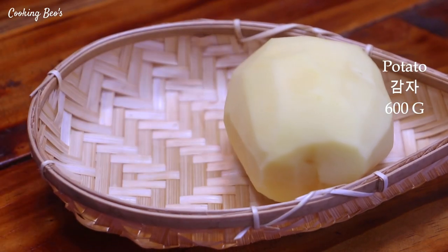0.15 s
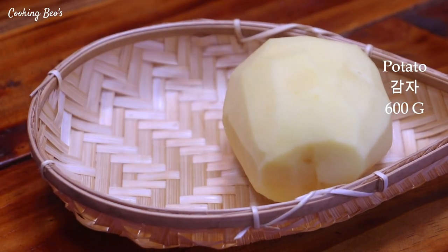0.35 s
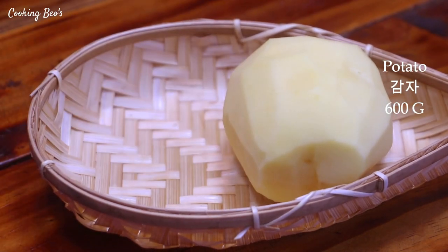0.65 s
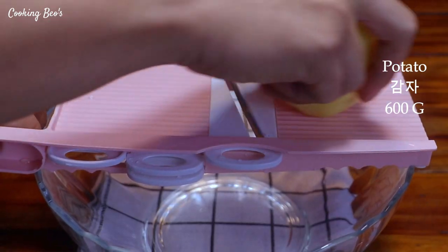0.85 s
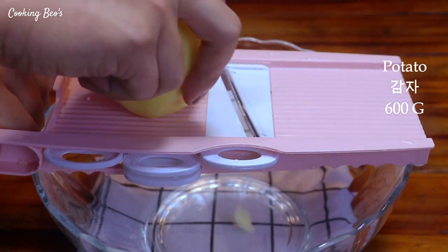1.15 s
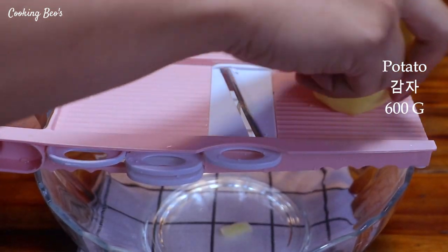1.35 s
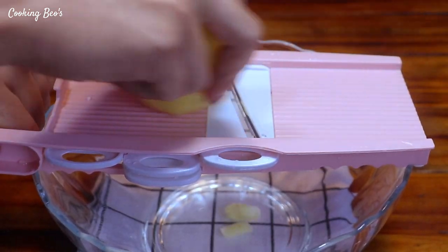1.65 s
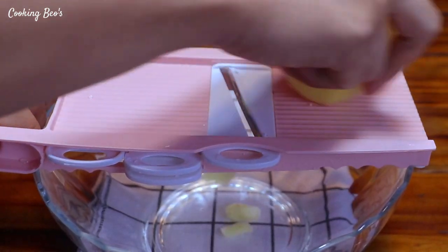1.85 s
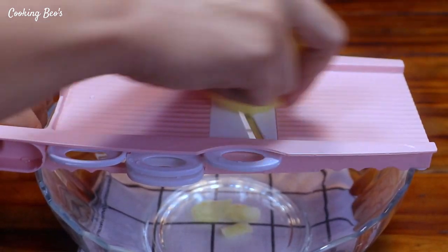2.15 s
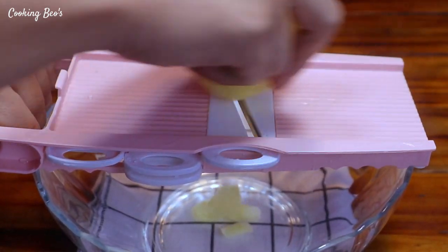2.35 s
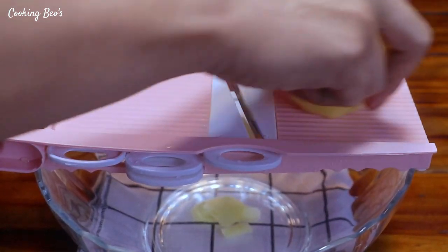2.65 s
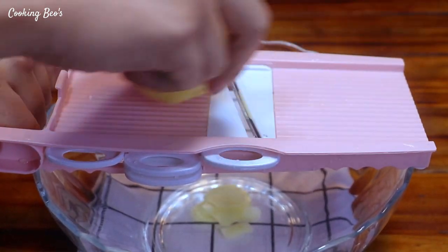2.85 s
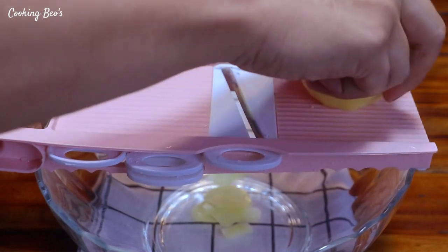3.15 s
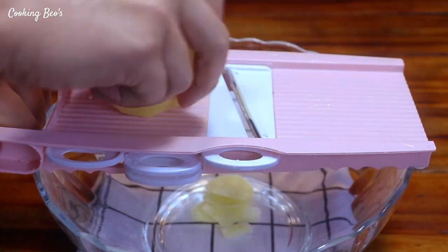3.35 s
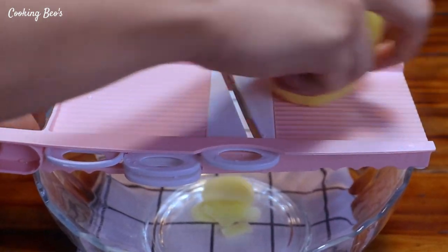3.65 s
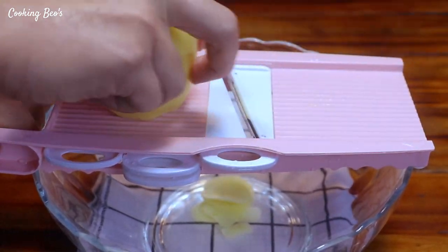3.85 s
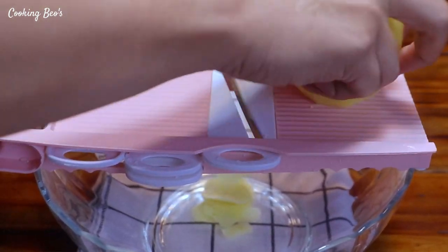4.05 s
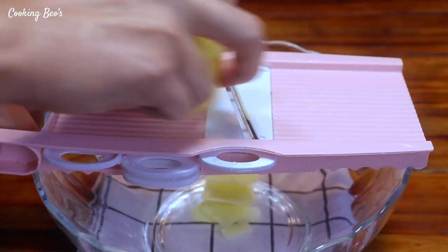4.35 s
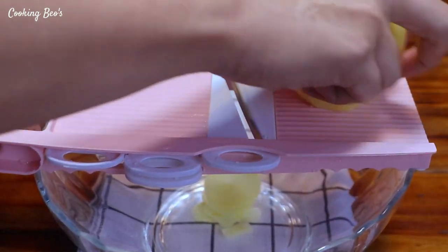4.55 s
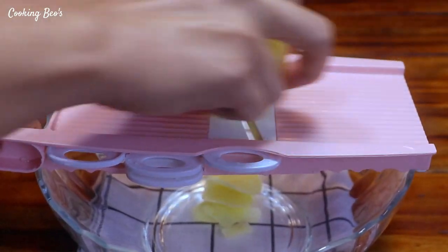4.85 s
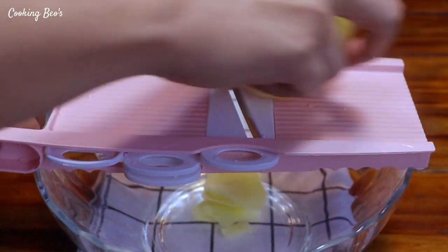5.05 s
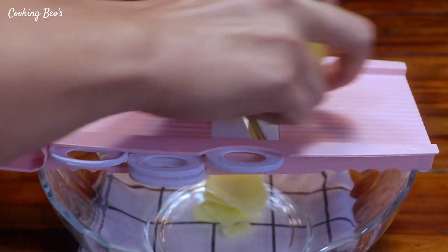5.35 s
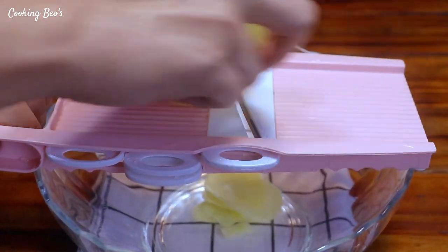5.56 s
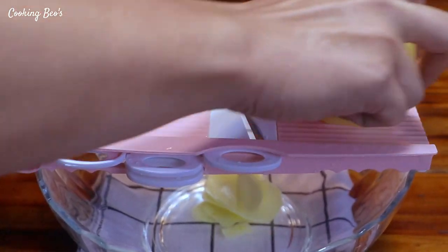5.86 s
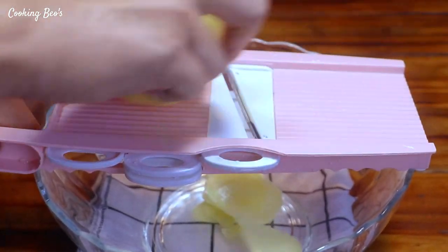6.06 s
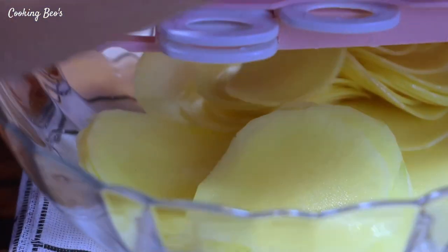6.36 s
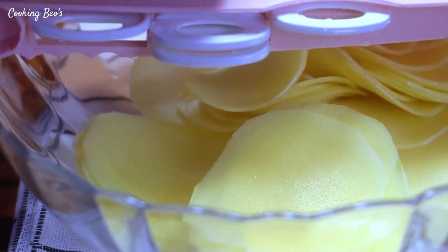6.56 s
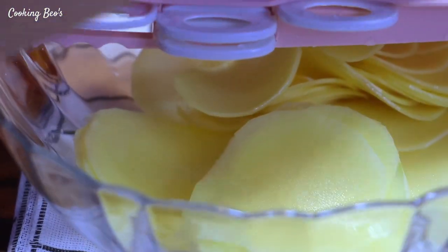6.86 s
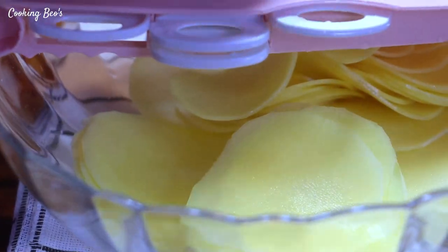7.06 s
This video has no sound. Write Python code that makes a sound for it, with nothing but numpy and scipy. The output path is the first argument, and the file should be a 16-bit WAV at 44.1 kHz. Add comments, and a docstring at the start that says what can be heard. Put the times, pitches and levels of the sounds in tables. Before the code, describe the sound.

After a short silence and a faint noise burst, a raw potato is pushed over a plastic slicer resting on a glass bowl. It groans and squeaks softly, then settles into wet, grainy rasps twice a second, with snaps and hollow knocks growing louder. Later, quicker rubs fill the gaps. Close microphone, slightly overloaded, small kitchen reverberation.

```python
"""After silence a brief burst of noise, without reverberation, opens the sound; a kitchen murmurs, a table rumbles.
A raw potato goes to and fro over a plastic mandoline on a glass bowl: it catches, groans or squeaks, and the
blade bites, rasps through wet cells and snaps slices free. Crackling force excites the plate's resonances.
Rubs over the ribs, ringing knocks as the potato lands or the plate hits the bowl and, once, a singing blade
join in, made of crackle, noise bursts and a sine. The close microphone overloads and the sound is doubled."""
import sys
import numpy as np
from scipy import signal
from scipy.fft import rfft, irfft, next_fast_len
from scipy.io import wavfile
from scipy.ndimage import uniform_filter1d, map_coordinates

SR = 44100
rng = np.random.default_rng(int(sys.argv[2]) if len(sys.argv) > 2 else 0)


def transcribe(u):
    """Save the signal u as a 16-bit wav file named by the first command-line argument.

    u: samples, shape (n,) or (channels, n), limited to [-1, 1]; the rate is SR.
    q: integer samples, one column per channel.
    """
    v = np.clip(np.atleast_2d(u).T, -1, 1)
    q = np.round(v * 32767).astype(np.int16)
    wavfile.write(sys.argv[1], SR, q)


N = 317860
START = 0.7  # s, silence before the sound
BOW_SHARE = 0.48  # the plate bows most at this share of a cut's hold

# All table levels are relative: each layer adds its own trim.
# passes through the blade: [t/s, rise/s, hold/s, bite level/dB, exit level/dB, slide level/dB, flex level/dB,
# hiss over rasp/dB, bite f/Hz, exit f/Hz]
CUT_PASSES = [(0.819, 0.06, .095, -22, -22, -48, -32, -4.5, 2590, 2420),
              (1.332, 0.022, 0.064, -16, -17, -43, -21.5, -3.5, 2340, 2140),
              (1.78, 0.036, .034, -12.5, -13.5, -29.5, -22, -3, 1950, 1790),
              (2.21, 0.051, 0.074, -12.5, -23, -37.5, -21, -4.5, 1850, 1290),
              (2.647, 0.048, 0.041, -10.5, -15, -25, -22, -4, 2320, 1380),
              (3.114, 0.04, 0.051, -9.5, -16, -33.5, -19, -4, 3110, 1620),
              (3.564, 0.039, 0.052, -8, -16, -35.5, -17.5, -5, 2960, 2000),
              (4.026, 0.041, 0.043, -5.5, -22.5, -39, -16.5, -5, 3460, 1730),
              (4.489, 0.041, 0.069, -5, -18, -35.5, -19.5, -6, 3550, 1950),
              (4.94, 0.036, 0.072, -5.5, -16, -31.5, -18, -6, 3520, 1980),
              (5.409, 0.041, 0.067, -6, -13, -27, -18.5, -5, 3430, 2900),
              (5.854, 0.037, 0.062, -4, -8.5, -24, -14, -6, 2750, 2410),
              (6.267, .036, 0.062, -7.5, -11, -32.5, -22, -4.5, 3230, 2030),
              (6.724, 0.044, 0.039, -8.5, -11.5, -29, -19.5, -3.5, 3230, 2200)]
# knocks as the potato lands on the plate or the plate hits the bowl: [t/s, level/dB, flex over level/dB,
# hiss over level/dB, flex centre f/Hz, ring centre f/Hz]
PLATE_KNOCKS = [(1.323, -14, -18, -6.5, 520, 1750), (1.774, -17, -11.5, -4.5, 587, 2670),
                (2.085, -43.5, 1.5, -18, 597, 2300), (2.101, -41, 2, -23, 570, 2300),
                (2.206, -14, -17.5, -9, 590, 3800), (2.556, -29.5, -0.5, -29, 620, 1300),
                (2.562, -16, -9.5, -53, 624, 1420), (2.634, -17, -18, -8, 630, 2560),
                (3.017, -27, 0.5, -46, 590, 1300), (3.025, -10, -8.5, -50, 585, 1320),
                (3.436, -38, -1.5, -21, 610, 2300), (3.457, -35, -1, -33, 624, 1800),
                (3.93, -14, -16, -38, 635, 1310), (4.371, -15, -9.5, -50, 612, 1770),
                (4.858, 3.5, -15, -17, 622, 3480), (5.305, 2.5, -23, -15.5, 620, 2030),
                (5.754, -1.5, -16, -26, 615, 1900)]
# middle spectrum of the plate, damped or free: [f/Hz, level per Hz/dB]
RASP_SPECTRUM = [(700, -31.5), (1050, -9.5), (1220, 0.5), (1500, 4), (2300, 3.5), (3500, -3), (4400, -4),
                 (5600, -30), (6400, -41), (9000, -33.5)]


def amp(db):
    """Decibels to gain."""
    return 10 ** (np.asarray(db) / 20)


def unit(x):
    """x at rms 1."""
    return x / np.sqrt(np.mean(x ** 2) + 1e-20)


def along(points, hz):
    """(Hz, value) points read on a log frequency axis."""
    f, value = np.transpose(points)
    return np.interp(np.log(hz + 1), np.log(f), value)


def resonances(modes, hz):
    """Joint gain of (Hz, width Hz, dB) modes, whose powers add."""
    power = 0
    for centre, width, db in modes:
        power = power + (amp(db) * hz * width) ** 2 / ((centre * centre - hz * hz) ** 2 + (hz * width) ** 2)
    return np.sqrt(power)


def coloured(x, gain):
    """x through the causal minimum-phase filter that has this gain over frequency."""
    size = 2 * next_fast_len(len(x) // 2 + 4096)
    cepstrum = irfft(np.log(gain(np.fft.rfftfreq(size, 1 / SR)) + 1e-6), size)
    # folding the cepstrum forward in time makes the filter causal
    cepstrum[1:size // 2] *= 2
    cepstrum[size // 2 + 1:] = 0
    return irfft(rfft(x, size) * np.exp(rfft(cepstrum)), size)[:len(x)]


def wobble(rate):
    """A smooth random curve, rate knots a second."""
    knots = rng.standard_normal(int(N * rate / SR) + 4)
    return map_coordinates(knots, [np.arange(N) * rate / SR])


def crackle(rate, spread_db):
    """Tiny ruptures at random moments, a few much larger than the rest."""
    size = amp(spread_db * np.minimum(rng.exponential(size=N), 4))
    ruptures = rng.random(N) < rate / SR
    return ruptures * size * rng.choice([-1, 1], N)


def emphasis(hz, centre_hz, boost_db, octaves):
    """The potato's position on the plate favours the modes near one frequency."""
    return 1 + amp(boost_db) / (1 + (np.log2((hz + 1) / centre_hz) / octaves) ** 2)


def swept(x, centre_hz, boost_db, octaves, patchy_db):
    """x at rms 1 under a moving emphasis; the shifting contact lights up changing patches of modes."""
    hz, t, z = signal.stft(x, SR, nperseg=1024)
    gain = emphasis(hz[:, None], np.interp(t * SR, np.arange(N), centre_hz), boost_db, octaves)
    patches = uniform_filter1d(rng.standard_normal(z.shape), size=7, axis=0)
    patches = uniform_filter1d(patches, size=3, axis=1)
    gain = gain * amp(patchy_db * unit(patches))
    power = np.mean(np.abs(z) ** 2, axis=1)
    # the sweep changes colour only: every frame is levelled
    levelled = z * gain / np.sqrt(power @ gain ** 2)
    return unit(signal.istft(levelled, SR, nperseg=1024)[1][:N])


def rasp(hz, broad_db=-7):
    """The middle voice of the plate while the potato damps it."""
    # resonances of the plate under the potato: [f/Hz, width/Hz, level/dB]
    loaded_modes = [(1175, 143, -0.5), (1847, 46, -2.5), (2626, 41, -3), (3050, 134, -7), (3435, 260, 0),
                    (3883, 385, 1), (5500, 120, 0), (5380, 110, 16)]
    return amp(along(RASP_SPECTRUM, hz)) * np.hypot(amp(broad_db), resonances(loaded_modes, hz))


def flex(hz, edge_hz=1100, low_hz=190):
    """The hollow low voice of the bending plate, which is too small to radiate deep bass."""
    # bending modes of the plate on the bowl, pressed by the hand: [f/Hz, width/Hz, level/dB]
    bending_modes = [(225, 80, -14.5), (284.4, 6.7, -6.5), (349, 39, -4), (558, 89, 1.5), (589, 26, -1.5),
                     (634, 25, 2.5), (704, 66, 0), (735, 96, -2), (940, 410, -8)]
    return resonances(bending_modes, hz) / np.sqrt(1 + (hz / edge_hz) ** 8 + (low_hz / (hz + 1)) ** 4)


def hiss(hz):
    """The wet treble, straight from the blade's edge."""
    # treble spectrum: [f/Hz, level per Hz/dB]
    wet_spectrum = [(3000, -34.5), (5000, -4.5), (6000, -2), (7500, -3.5), (10300, -10), (15000, -9.5),
                    (16200, -28.5)]
    return amp(along(wet_spectrum, hz))


def opening(db=-21, length=0.013, t60=0.08):
    """One brief, fading noise burst through all three voices (length and t60 in s)."""
    t = np.arange(N) / SR - START
    force = rng.standard_normal(N) * (t > 0) * (t < length) * amp(-60 * np.abs(t) / t60)
    burst = coloured(force, lambda hz: rasp(hz) + .5 * flex(hz) + 0.21 * hiss(hz))
    return amp(db) * burst / np.sqrt(np.sum(burst ** 2) / (length * SR))


def air(db=-60):
    """The low murmur of the room, as coloured steady noise."""
    # murmur spectrum: [f/Hz, level per Hz/dB]
    room_spectrum = [(25, -34), (60, -3), (90, -23), (150, -25), (250, 10), (450, -12), (1000, -8),
                     (3000, -3.5), (6000, -12), (16000, -23)]
    return amp(db) * unit(coloured(rng.standard_normal(N), lambda hz: amp(along(room_spectrum, hz))))


def thuds(knock_db=-40.5, bow_db=-34.5, share=0.39):
    """(s, dB) of each push on the table by a knock or bowing plate; share is how much blow level counts."""
    knocks = [(s, knock_db + share * db) for s, db, *_ in PLATE_KNOCKS]
    bows = [(s + rise + BOW_SHARE * hold, bow_db + share * flex_db)
            for s, rise, hold, _, _, _, flex_db, *_ in CUT_PASSES]
    return knocks + bows


def table(rumble_db=2, thud_db=6, t60=0.26, scatter_db=2.5):
    """The wooden table rumbles under the sliding hand and its modes boom briefly at each soft thud."""
    # rumble as the hand shakes the table: [t/s, level/dB]
    hand_weight = [(0.7, -62), (1.151, -57), (1.9, -58), (4.6, -52), (5.9, -55), (6.1, -61), (7.21, -62.5)]
    # low modes of the table: [f/Hz, width/Hz, level/dB]
    table_modes = [(62.4, 24, -2), (106.8, 32, 0), (172, 147, -3.5)]
    shake = unit(coloured(rng.standard_normal(N), lambda hz: resonances(table_modes, hz) ** 2))
    rumble = amp(rumble_db + np.interp(np.arange(N) / SR, *np.transpose(hand_weight)))
    out = np.pad(shake * rumble, (0, SR))
    t = np.arange(SR // 3) / SR
    swell = 1 - np.exp(-(t / .012) ** 2)
    for s, db in thuds():
        boom = np.zeros(len(t))
        for hz, _, level in table_modes:
            # each thud strikes the modes in slightly different proportions
            boom += amp(level + rng.normal(0, scatter_db)) * np.sin(2 * np.pi * hz * t)
        out[round(s * SR):][:len(t)] += amp(db + thud_db - 60 * t / t60) * swell * boom
    return out[:N]


def blows(events, middle, chatter, t60, middle_db, flex_db, hiss_db, middle_boost_db, flex_boost_db):
    """Each contact chatters for chatter s, then dies away over t60 s; the spot where it lands colours it."""
    out, t = np.zeros(N + SR), np.arange(SR // 6) / SR
    fade = amp(-60 * np.maximum(t - chatter, 0) / t60)
    for s, db, low, high, flex_hz, middle_hz in events:
        force = rng.standard_normal(len(t)) * fade
        clack = lambda hz: middle(hz) * emphasis(hz, middle_hz, middle_boost_db, octaves=0.13)
        thump = lambda hz: flex(hz) * emphasis(hz, flex_hz, flex_boost_db, octaves=0.089)
        for voice, level in ((clack, middle_db), (thump, low + flex_db), (hiss, high + hiss_db)):
            part = coloured(force, voice)
            # levelled on its first 10 ms
            out[round(s * SR):][:len(t)] += amp(db + level) * part / part[:SR // 100].std()
    return out[:N]


def snapping():
    """Damped snaps: short noise bursts in the loaded plate as the potato catches or sheds its slice."""
    # the potato catches, meets the blade or sheds its slice: [t/s, level/dB, flex over level/dB,
    # hiss over level/dB, flex centre f/Hz, rasp centre f/Hz]
    snaps = [(0.747, -38, -19, -11, 297, 2570), (0.926, -12.5, -16, -7.5, 530, 3560),
             (1.1185, -18.5, -33, -14, 340, 3900), (1.1626, -16.5, -9, -35, 610, 1210),
             (1.1834, -24, -12, -4.5, 676, 2270), (1.3718, -8, -30, -20, 690, 3460),
             (1.3892, -3.5, -15, -24, 637, 1370), (1.6404, -16, -7.5, -15, 600, 1190),
             (1.8446, 2.5, -15.5, -15, 603, 1600), (2.293, 0.5, -19, -31, 635, 1240),
             (2.7235, 5.5, -19, -18, 577, 1290), (2.846, -15.5, -29, -12, 800, 1230),
             (3.093, -18.5, -15, -12, 650, 2550), (3.1133, -10.5, -25, -10.5, 530, 2030),
             (3.5465, -18, -3.5, -12, 547, 1860), (3.565, -5.5, -15, -13.5, 620, 1830),
             (3.6447, -8.5, -17.5, -8, 655, 1670), (4.003, -21, 0, -10, 644, 1160),
             (4.025, -8.5, -8.5, -8, 610, 2000), (4.0974, -10, -1.5, -19, 597, 1260),
             (4.1115, -2.5, -15.5, -11.5, 720, 1590), (4.4652, -15, -5, -16, 776, 1900),
             (4.4876, -4, -26, -10, 630, 1830), (4.5664, -8.5, -8, -5.5, 570, 1280),
             (4.9124, -15, -1, -12, 810, 1850), (4.937, -2, -15, -12, 588, 2700),
             (5.0164, -6, -8.5, -29, 550, 1620), (5.139, -30, -31, -6.5, 650, 1210),
             (5.382, -9.5, -6.5, -22, 840, 2350), (5.407, -4.5, -12.5, -8.5, 595, 1800),
             (5.444, 0, -16, -15, 670, 3230), (5.4764, -4.5, -4.5, -9, 610, 1140),
             (5.8287, -9, -4.5, -18, 640, 2520), (5.8486, -9, -2, -8, 606, 2600),
             (5.8816, 2.5, -9.5, -10, 620, 1860), (5.9154, 7.5, -14.5, -17, 625, 1380),
             (6.124, -25.5, -2.5, -16, 490, 2000), (6.2533, -17, -3.5, -23, 640, 1670),
             (6.478, -14, -11.5, -12, 570, 3500), (6.523, -16.5, -30, -11, 686, 3930),
             (6.5555, -20, -12, -19, 513, 3500), (7.03, -27.5, -0.5, -19, 506, 2300),
             (7.0476, -17.5, -10, -19, 540, 2280), (7.168, -14.5, -2.5, -24, 785, 1770)]
    return blows(snaps, rasp, chatter=0.0038, t60=0.034, middle_db=-9.5, flex_db=-0.5, hiss_db=-6.5,
                 middle_boost_db=6.5, flex_boost_db=9.5)


def kitchen(x, build=0.014):
    """Hard walls answer with a diffuse tail that builds up (s), each frequency dying at its own speed."""
    # reverberation of the kitchen: [f/Hz, t60/s]
    decay_times = [(80, 0.7), (200, 0.78), (530, 0.33), (1250, 0.4), (2200, 0.23), (3300, 0.29),
                   (4600, 0.38), (7000, 0.28), (15000, 0.21)]
    out, piece = np.zeros(N + 2 * SR), SR // 3
    # every third of a second meets a fresh random tail
    for first in range(0, N, piece):
        hz, t, z = signal.stft(rng.standard_normal(SR * 2 // 3), SR, nperseg=256)
        decay = amp(-60 * t / along(decay_times, hz)[:, None])
        tail = signal.istft(z * decay * (1 - np.exp(-t / build)), SR, nperseg=256)[1]
        answer = signal.fftconvolve(x[first:first + piece], tail / np.linalg.norm(tail))
        out[first:first + len(answer)] += answer
    return out[:N]


def groans(waver=70, peak_share=0.38, edge_db=-14.5):
    """Stick-slip of wet flesh locks on to one rough, gliding note, loudest at peak_share of its length."""
    # the flesh groans or squeaks: [t/s, length/s, level/dB, start f/Hz, end f/Hz]
    stick_slips = [(0.814, 0.029, -32, 2280, 2340), (0.894, 0.11, -23, 479.4, 622),
                   (1.045, 0.054, -23.5, 2270, 2380), (1.116, 0.093, -35, 404, 275),
                   (1.518, 0.068, -27.5, 622, 427), (1.587, .1, -36, 367, 283)]
    t, out = np.arange(N) / SR, np.zeros(N)
    rough = wobble(waver) + 1j * wobble(waver)  # random swings of level and phase
    for s, length, db, start_hz, end_hz in stick_slips:
        on = (t > s) & (t < s + length)
        progress = (t[on] - s) / length
        phase = 2 * np.pi * np.cumsum(start_hz + (end_hz - start_hz) * progress) / SR
        swell_db = np.interp(progress, [0, peak_share, 1], [edge_db, 0, edge_db])
        out[on] += amp(db + swell_db) * np.real((0.56 + 1.0 * rough[on]) * np.exp(1j * phase))
    return out


def shear(hz, centre_hz=5000, width_hz=1700):
    """The bright band of flesh splitting along the edge."""
    return resonances([(centre_hz, width_hz, 0)], hz) ** 3


def scrape(strokes, force, rasp_db, flex_db, hiss_db, release, rasp_boost_db, flex_boost_db, slip_db, shear_db):
    """A grainy force drives the plate; level and colour follow the potato along each stroke."""
    patchy_db = 3  # depth of the shifting patches of modes
    wander_octaves, wander_rate = 0.14, 25  # the moving contact shifts the flex centre; knots a second
    t, gains = np.arange(N) / SR, np.zeros((3, N))
    for rows in strokes:
        s, level, low, high = np.transpose(rows)[:4]
        near = slice(round((s[0] - .02) * SR), round((s[-1] + .08) * SR))
        early = np.maximum(s[0] - t[near], 0)
        late = np.maximum(t[near] - s[-1], 0)
        contact = np.exp(-early / 0.0081 - late / release)
        for gain, db in zip(gains, (level + rasp_db, low + flex_db, level + high + hiss_db)):
            gain[near] += contact * amp(np.interp(t[near], s, db))
    s, *_, rasp_hz = np.vstack(strokes).T
    rasp_centre = np.interp(t, np.maximum.accumulate(s), rasp_hz)
    middle = swept(coloured(force, rasp), rasp_centre, rasp_boost_db, octaves=0.83, patchy_db=patchy_db)
    # the whole potato moves in slow jerks, which bend the plate
    jerks = coloured(force * amp(slip_db * wobble(90)), flex)
    flex_centre = 630 * 2 ** (wander_octaves * wobble(wander_rate))  # Hz
    bottom = swept(jerks, flex_centre, flex_boost_db, octaves=0.23, patchy_db=patchy_db)
    # the faster the potato travels, the higher its rasp and the more the flesh shears
    speed = np.clip((rasp_centre - 2300) / 1000, 0, 1.2)
    middle = middle + speed * amp(shear_db) * unit(coloured(rng.standard_normal(N), shear))
    return gains[0] * middle + gains[1] * bottom + gains[2] * unit(coloured(force, hiss))


def cut_stages(s, rise, hold, bite_db, exit_db, slide_db, flex_db, hiss_db, bite_hz, exit_hz):
    """One pass enters, bites, bows, exits, slides, rests: (s, rasp dB, flex dB, hiss over rasp dB, rasp Hz)."""
    entry_db, sag_db = -20, -9  # entry below the bite; the rasp sags while the plate bows
    flex_entry_db, flex_bite_db, flex_exit_db, flex_slide_db = -11, -6, -9, -21.5  # against the full bow
    clear_s, slide_s, slide_fade_db = 0.035, 0.086, -17.5  # leaves the blade, slides to rest and fades
    entry_hz = 2400
    dry_db = hiss_db - 5  # the hiss drops once the slice is off
    bite = s + rise
    bow = bite + BOW_SHARE * hold
    clear = bite + hold + clear_s
    slide_flex_db = flex_db + flex_slide_db
    return [(s, bite_db + entry_db, flex_db + flex_entry_db, hiss_db, entry_hz),
            (bite, bite_db, flex_db + flex_bite_db, hiss_db, bite_hz),
            (bow, (bite_db + exit_db) / 2 + sag_db, flex_db, hiss_db, (bite_hz + exit_hz) / 2),
            (bite + hold, exit_db, flex_db + flex_exit_db, dry_db, exit_hz),
            (clear, slide_db, slide_flex_db, dry_db, exit_hz),
            (clear + slide_s, slide_db + slide_fade_db, slide_flex_db + slide_fade_db, dry_db, exit_hz)]


def cutting():
    """The blade bursts thousands of cells a second, in clumps as the flesh sticks and gives."""
    force = crackle(rate=9000, spread_db=2.0) * amp(2.86 * wobble(260))
    strokes = [cut_stages(*row) for row in CUT_PASSES]
    return scrape(strokes, force, rasp_db=-0.05, flex_db=0.0, hiss_db=-1.0, release=0.015,
                  rasp_boost_db=4.0, flex_boost_db=7.5, slip_db=2.5, shear_db=-9.0)


def rub_stages(s, rise, fall, rasp_db, flex_db, hiss_db, rasp_hz):
    """One rub swells and fades in a rounded arch: (s, rasp dB, flex dB, hiss over rasp dB, rasp Hz)."""
    edge_db, flex_edge_db, roundness = -28.5, -13.5, 1.4  # drop at the nominal ends, power of the arch
    # -1 start, 0 peak, 1 end; the step back after the peak can make the level jump slightly
    places = np.array([-0.78, -0.39, 0.13, 0.062, 0.8])
    times = np.interp(places, [-1, 0, 1], [s, s + rise, s + rise + fall])
    depths = np.abs(places) ** roundness
    return [(t, rasp_db + depth * edge_db, flex_db + depth * flex_edge_db, hiss_db, rasp_hz)
            for t, depth in zip(times, depths)]


def rubbing():
    """The wet cut face chatters over the ribs, as sparser crackle through the same plate."""
    # rubs over the ribbed plate: [t/s, rise/s, fall/s, rasp level/dB, flex level/dB, hiss over rasp/dB,
    # rasp centre f/Hz]
    rubs = [(1.03, 0.039, 0.061, -23, -32, -9.5, 2090), (1.131, .032, 0.043, -32, -30.5, -7, 1400),
            (1.519, .036, 0.012, -10.5, -30, -11, 2090), (1.575, 0.018, 0.1, -31, -31.5, -8, 1800),
            (3.69, 0.038, 0.085, -38, -42, -7, 2700), (4.15, .03, 0.13, -37, -47, -8, 2500),
            (4.645, 0.02, 0.11, -41, -54, -7, 3460), (6.113, 0.039, 0.038, -16, -32, -13, 2920),
            (6.19, 0.037, 0.028, -21.5, -43, -13.5, 2250), (6.432, 0.039, 0.075, -15.5, -27, -13.5, 3000),
            (6.565, 0.037, .022, -8.5, -24, -15, 4300), (6.64, 0.048, 0.016, -10, -32, -22.5, 2340),
            (6.88, 0.064, 0.098, -17, -34, -13, 2780), (7.048, 0.03, 0.028, -14, -24.5, -14.5, 2920),
            (7.11, 0.03, 0.0077, -20, -50, -20, 2170), (7.174, 0.026, .05, -12.5, -22.5, -4.5, 1930)]
    force = crackle(rate=3100, spread_db=2.5) * amp(1.7 * wobble(200))
    strokes = [rub_stages(*row) for row in rubs]
    return scrape(strokes, force, rasp_db=-1.5, flex_db=-2.0, hiss_db=-1.1, release=0.0019,
                  rasp_boost_db=12, flex_boost_db=-12, slip_db=2.5, shear_db=-22.0)


def ring(hz, broad_db=-12):
    """The middle voice of the free plate."""
    # ringing modes of the free plate: [f/Hz, width/Hz, level/dB]
    plate_modes = [(1230, 90, -3), (1800, 85, 1), (2330, 75, 0), (2610, 65, -5), (2980, 60, -7),
                   (3280, 55, -2), (4300, 60, -7), (5440, 70, -20)]
    modes = resonances(plate_modes, hz) / np.sqrt(1 + (1000 / (hz + 1)) ** 8)
    return np.hypot(amp(broad_db + along(RASP_SPECTRUM, hz)), modes)


def knocking():
    """The potato lands on the plate or the plate hits the bowl: short noise bursts excite the free modes."""
    return blows(PLATE_KNOCKS, ring, chatter=0.0044, t60=0.038, middle_db=-5, flex_db=3.5, hiss_db=-10.0,
                 middle_boost_db=0.5, flex_boost_db=2.5)


def blade(note_db=-6, tick_db=4, uneven=0.6):
    """One thin steel note, a sine, fades unevenly after a flick."""
    # the steel blade is flicked and sings: [t/s, f/Hz, level/dB, t60/s]
    flicks = [(2.013, 3470, -31.5, 0.29)]
    out, t = np.zeros(N + SR), np.arange(SR // 2) / SR
    for s, hz, db, t60 in flicks:
        waver = (1 + uneven * wobble(48))[:len(t)]
        note = amp(note_db - 60 * t / t60) * waver * np.sin(2 * np.pi * hz * t)
        tick = coloured(rng.standard_normal(len(t)) * amp(-60 * t / 0.042), lambda f: hiss(f) + rasp(f))
        out[round(s * SR):][:len(t)] += amp(db) * (note + amp(tick_db) * tick)
    return out[:N]


def scene():
    """Strokes and contacts in the kitchen, one channel."""
    slicer = snapping() + groans() + cutting() + rubbing() + knocking() + blade()
    return (opening() + air() + table() + slicer + amp(-14.5) * kitchen(slicer))[None]


def record(dry, top=0.68, hardness=6, gain_db=-0.5, lead_db=-14):
    """Peaks overload softly, a weak copy runs just ahead, and deepest bass and highest treble are cut."""
    lead, top_hz = 0.01741, 16050  # s by which the copy runs ahead; Hz
    x = dry * amp(gain_db)
    x = x / (1 + np.abs(x / top) ** hardness) ** (1 / hardness)
    ahead = round(lead * SR)
    x = x + amp(lead_db) * np.pad(x[:, ahead:], ((0, 0), (0, ahead)))
    x = signal.sosfilt(signal.butter(2, 42, "high", fs=SR, output="sos"), x)
    x = x * (np.arange(N) / SR >= START)
    return signal.sosfilt(signal.ellip(12, .1, 90, top_hz, fs=SR, output="sos"), x)


dry = scene()
out = record(dry)
transcribe(out)
```